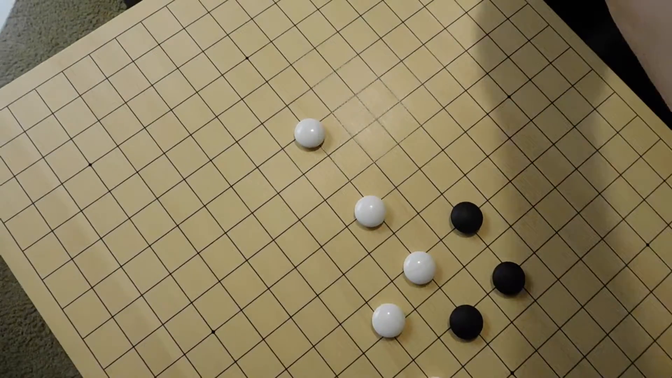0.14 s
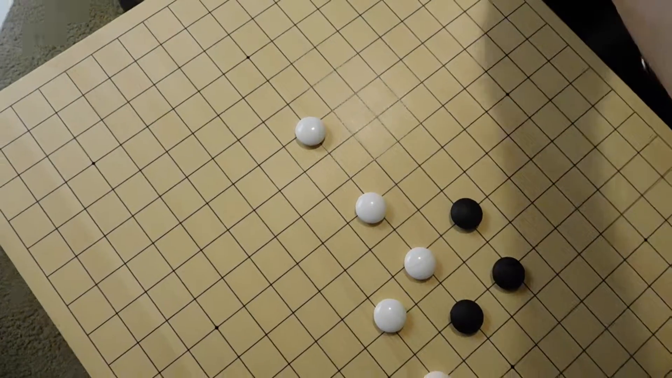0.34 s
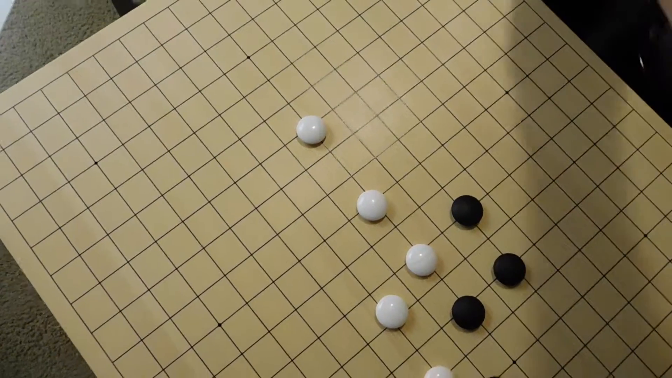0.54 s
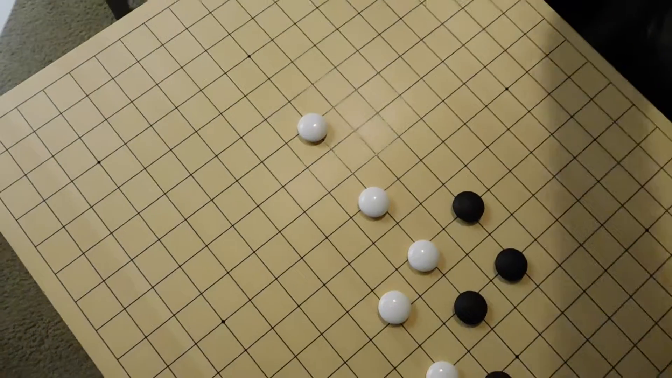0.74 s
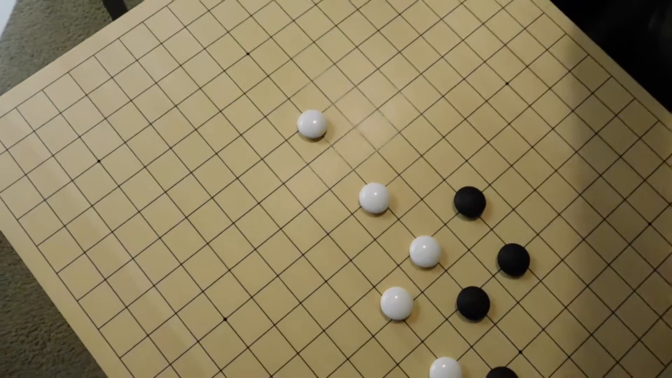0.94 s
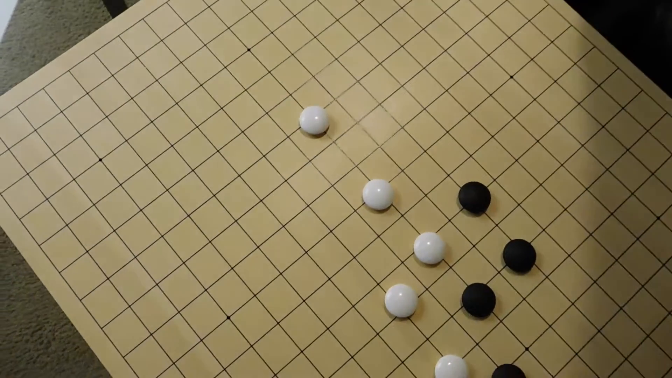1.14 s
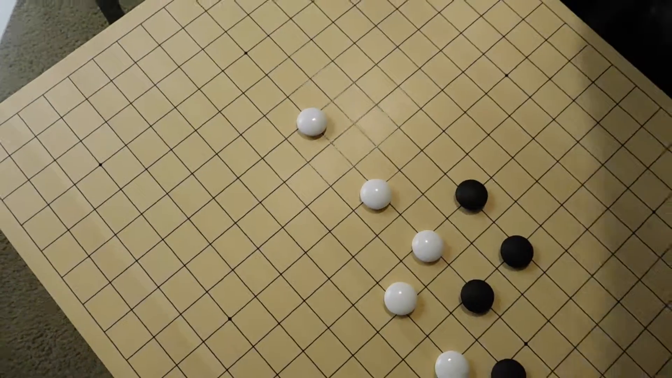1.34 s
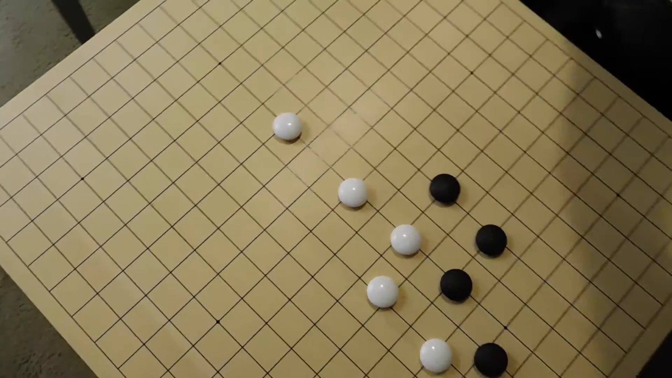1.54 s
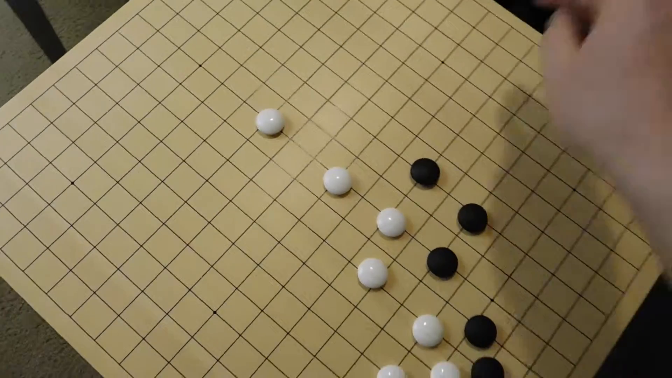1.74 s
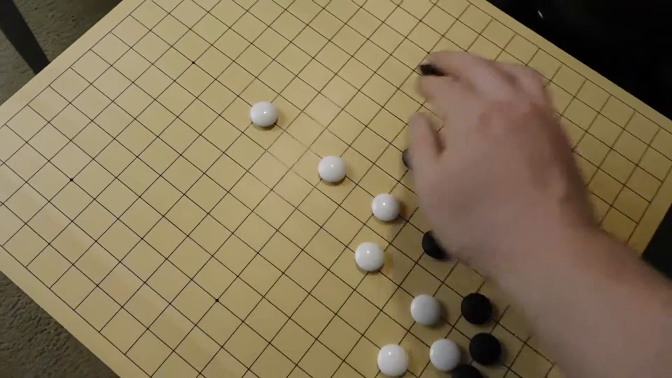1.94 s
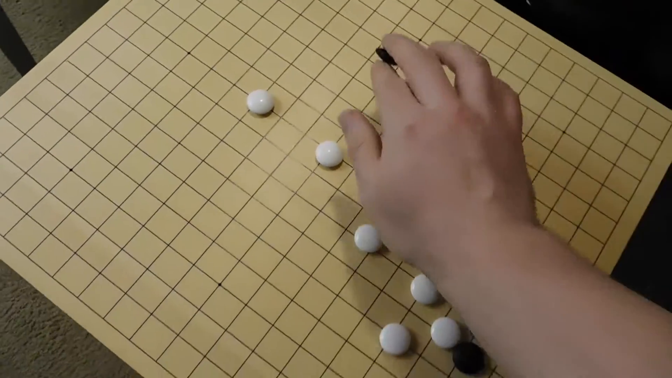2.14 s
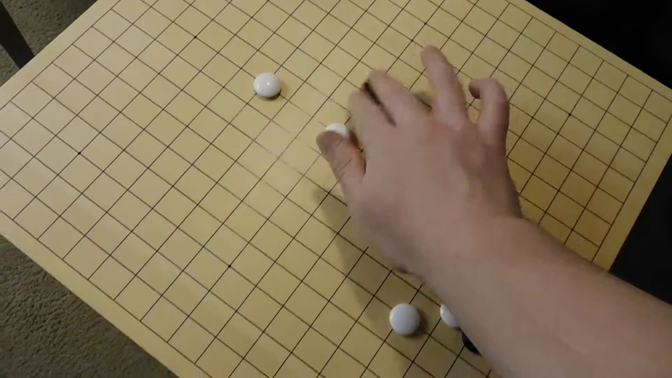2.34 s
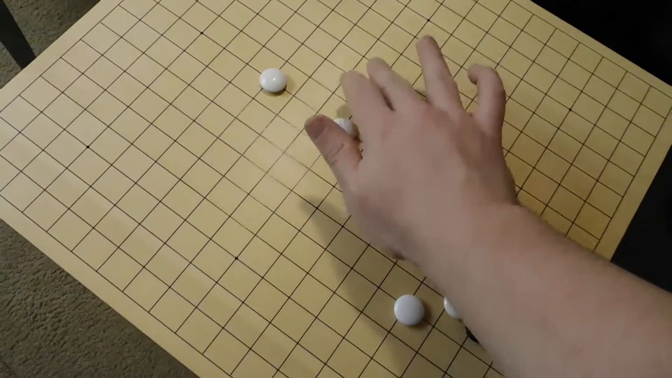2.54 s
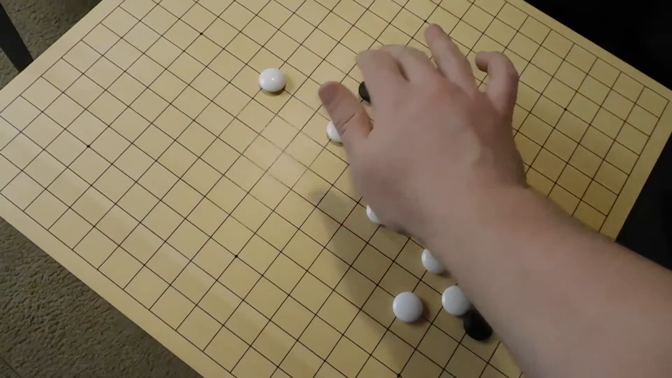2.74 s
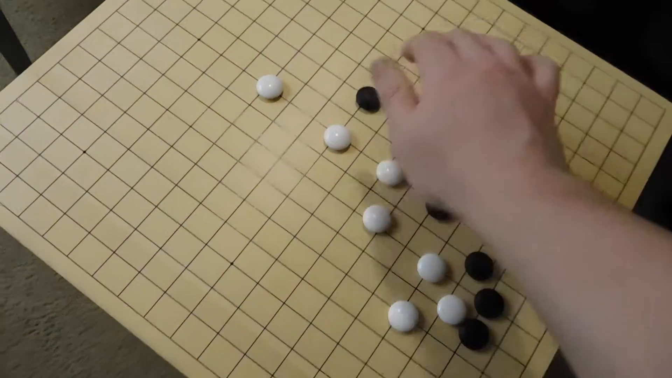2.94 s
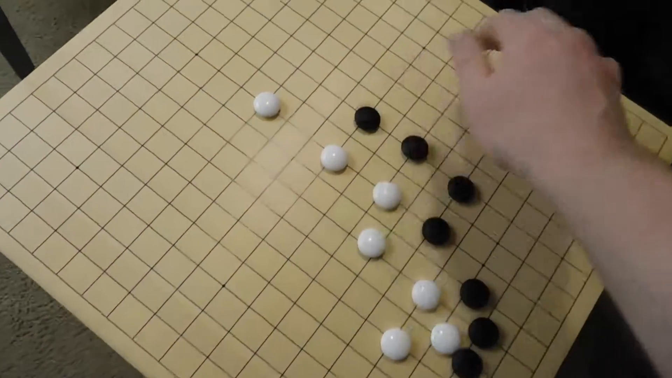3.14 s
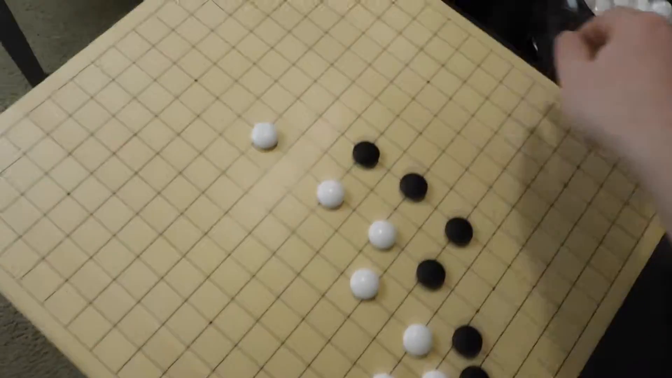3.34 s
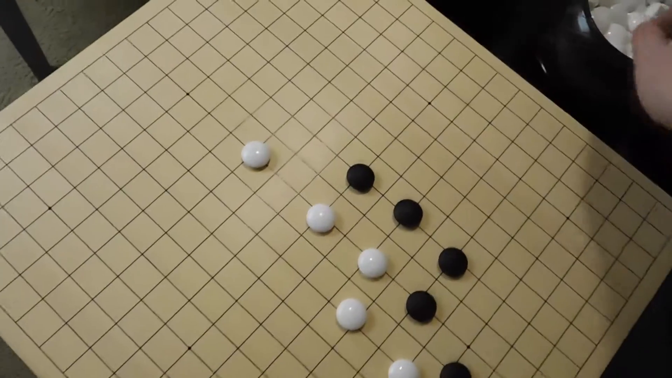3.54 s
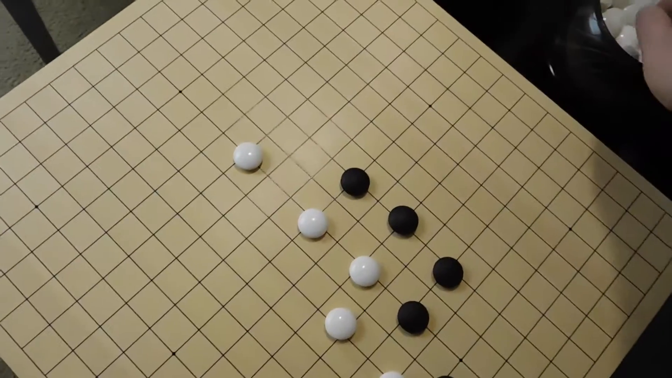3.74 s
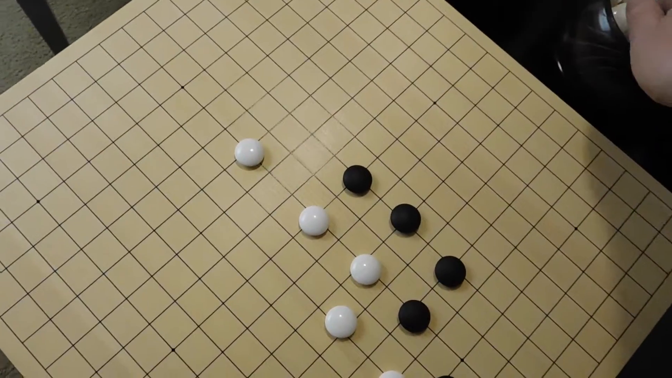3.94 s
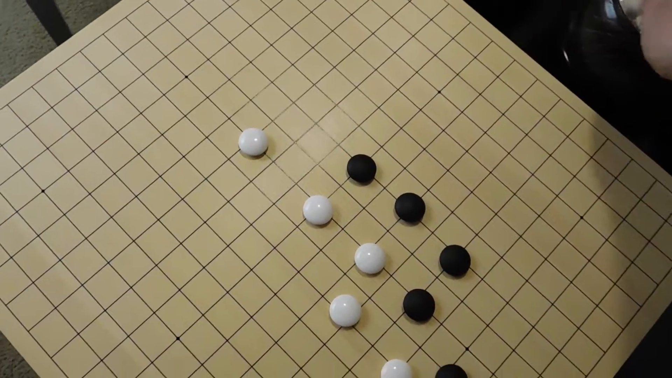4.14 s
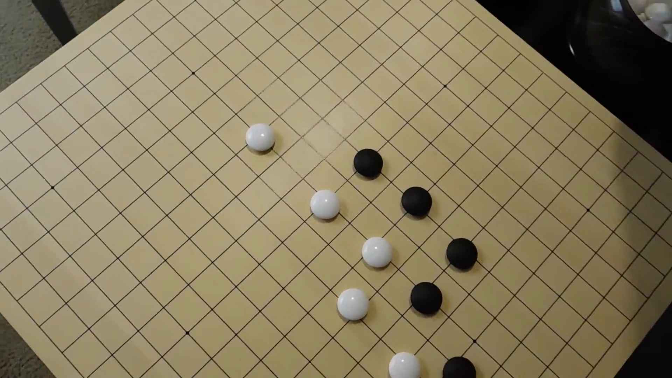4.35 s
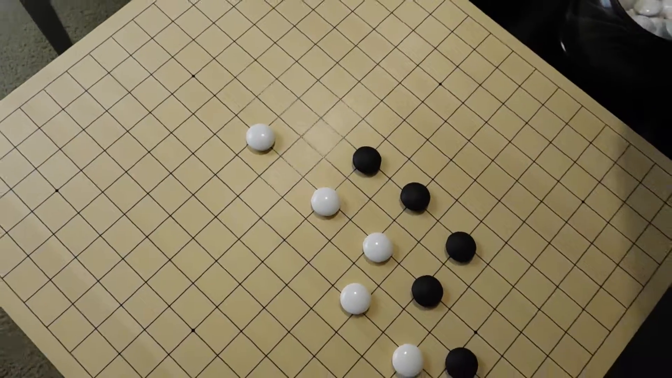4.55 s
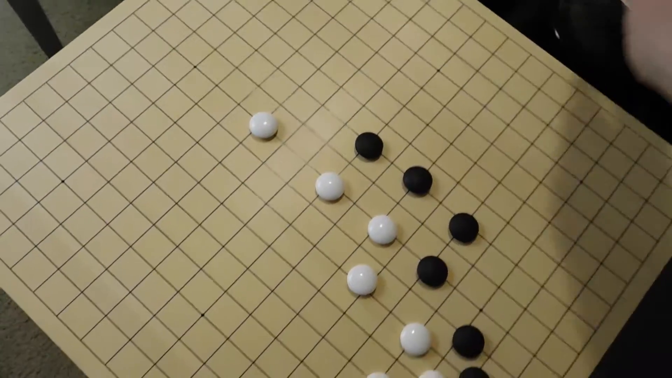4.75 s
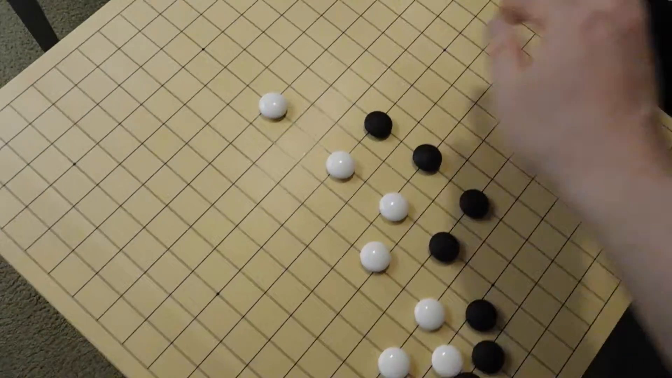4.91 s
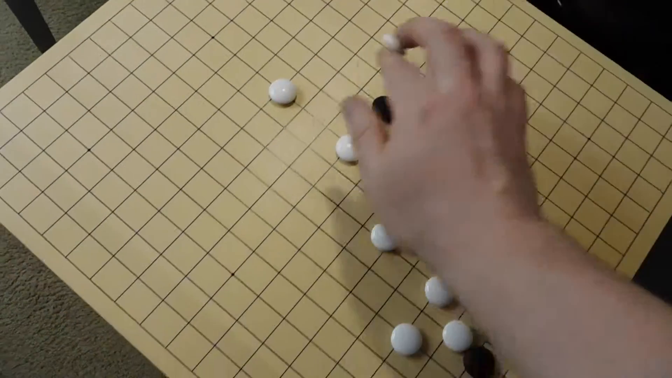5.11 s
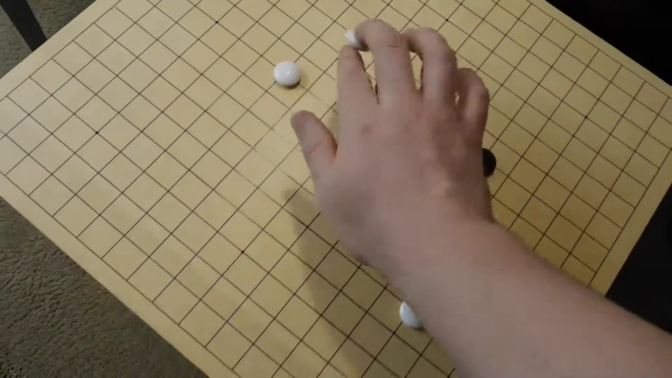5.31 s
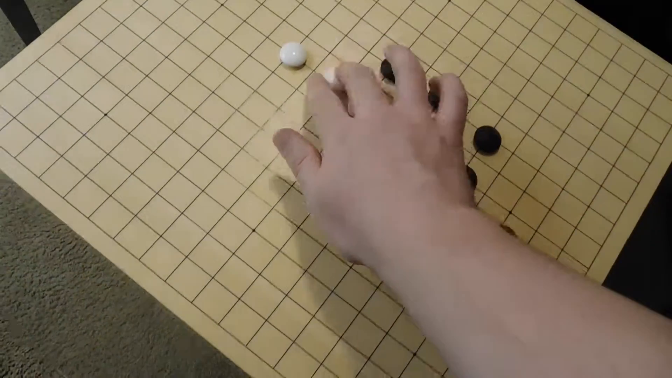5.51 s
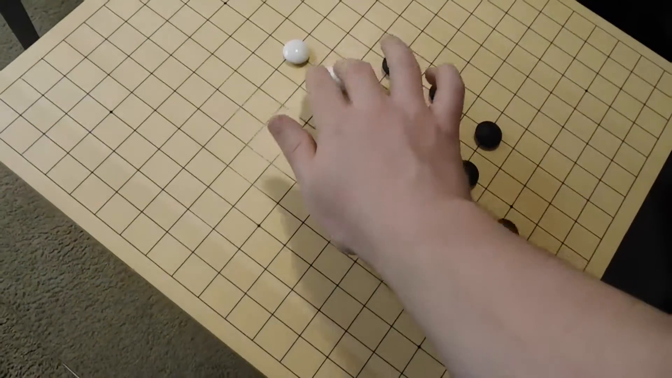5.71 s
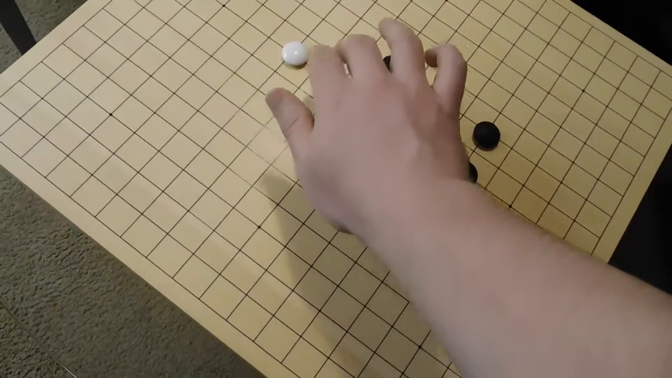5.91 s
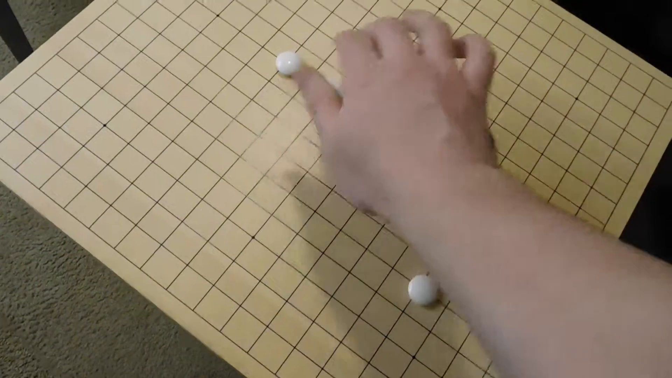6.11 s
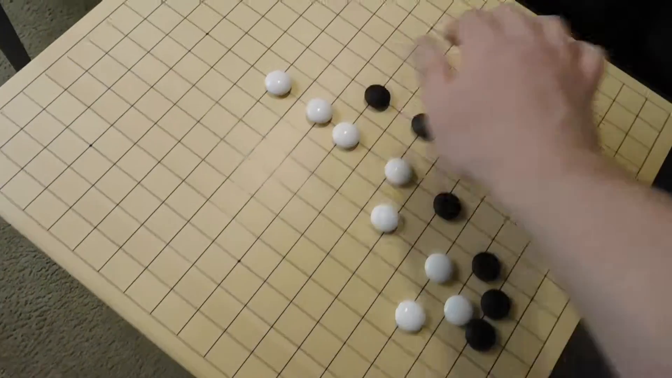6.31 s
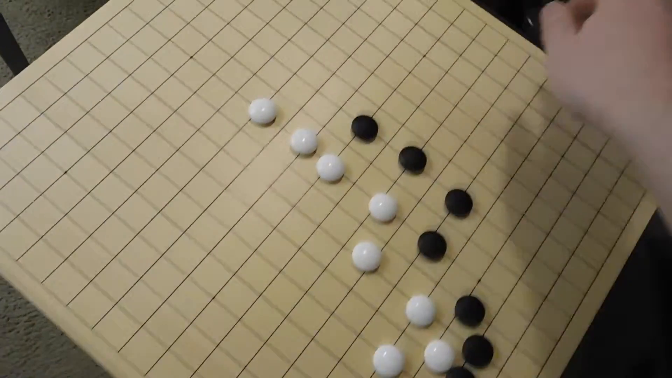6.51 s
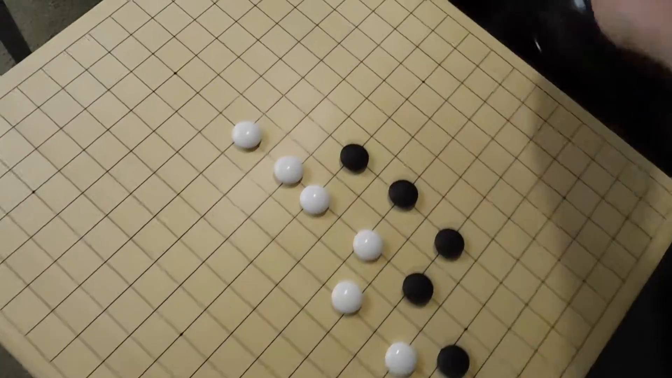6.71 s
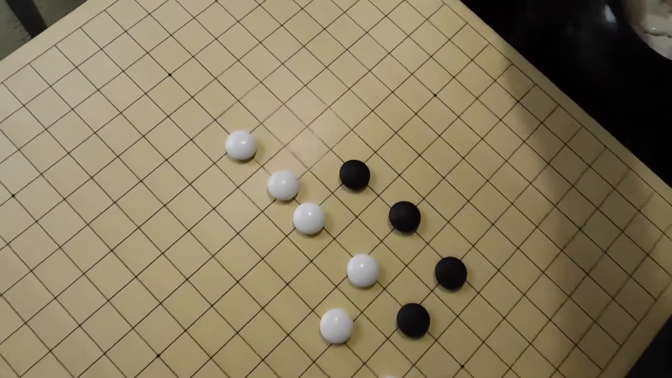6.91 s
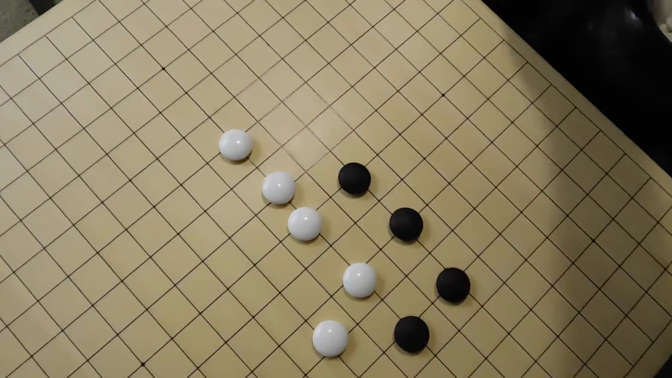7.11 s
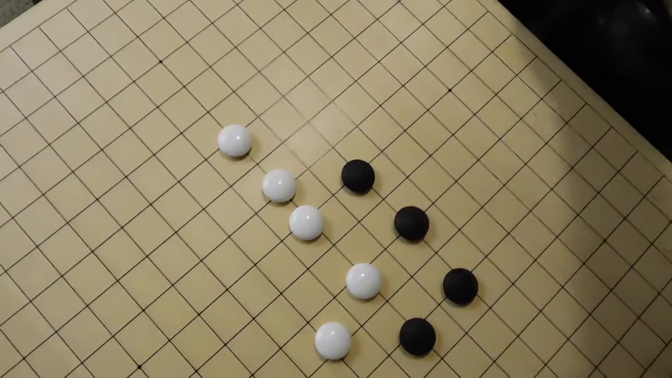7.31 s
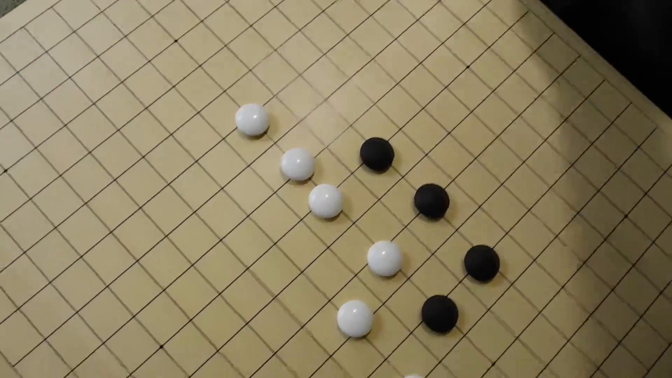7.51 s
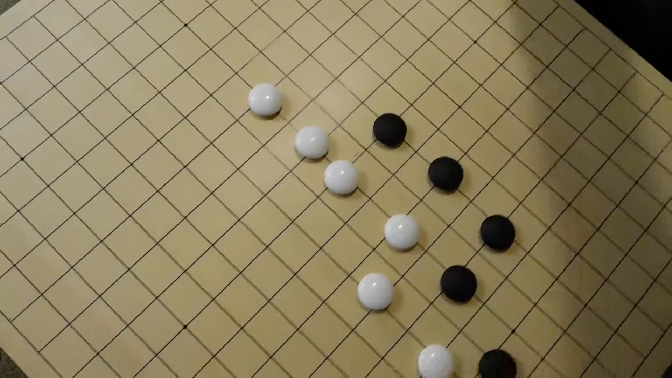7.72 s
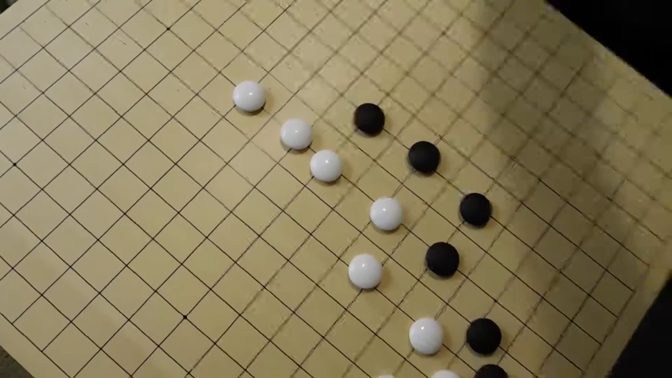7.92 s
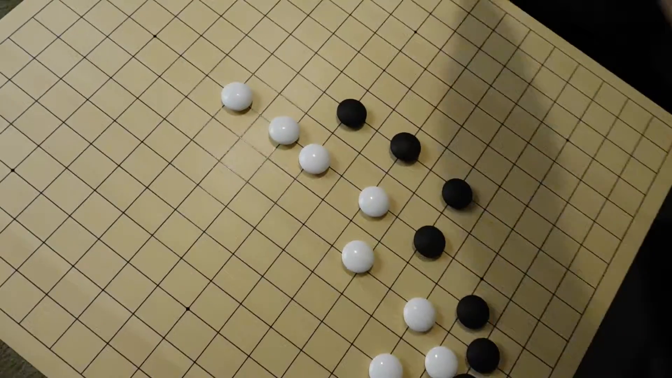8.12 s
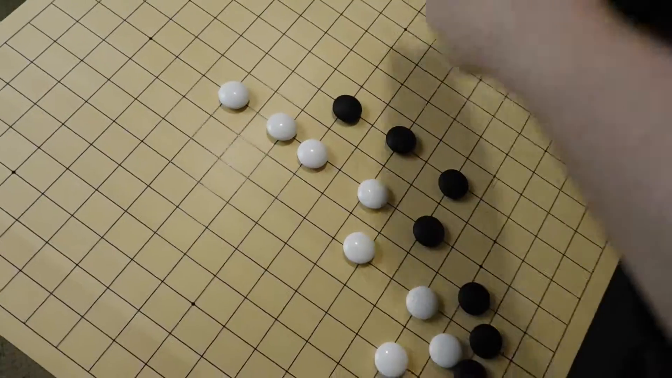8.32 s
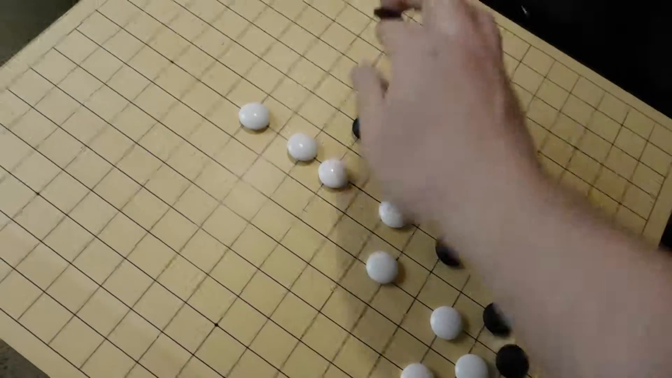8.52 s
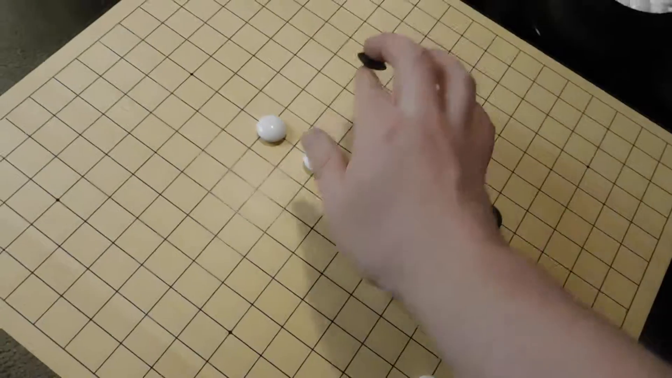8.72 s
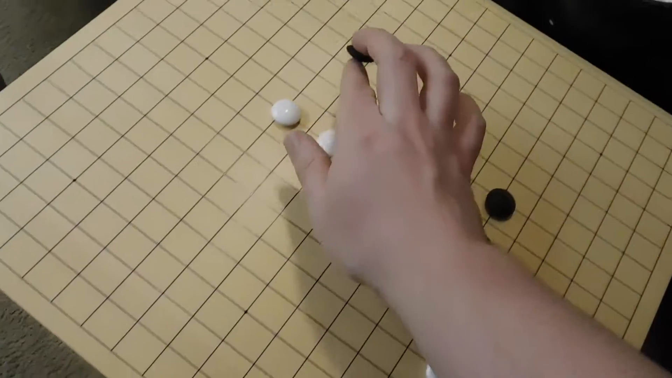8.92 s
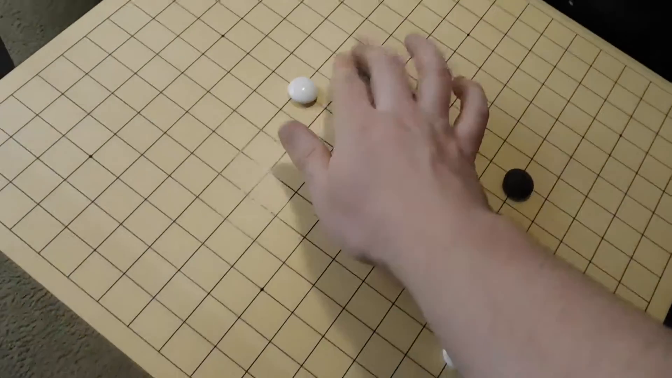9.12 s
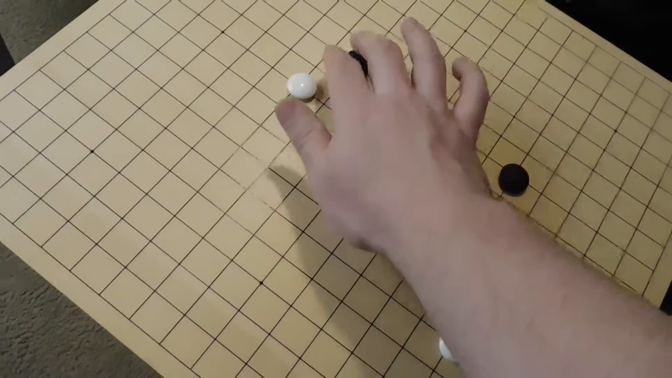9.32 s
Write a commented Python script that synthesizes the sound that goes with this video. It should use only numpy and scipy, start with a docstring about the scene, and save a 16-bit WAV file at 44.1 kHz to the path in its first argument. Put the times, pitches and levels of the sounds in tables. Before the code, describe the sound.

Three playing stones are slapped sharply onto a wooden board, with stones rattling softly in a bowl between moves.

```python
"""A small, quiet room: three playing stones are slapped onto a wooden board. Each blow rings the
board's modes, overloads the close microphone and sets the table wobbling. Between moves fingers stir
the stones in their bowl, where they tick, rattle and rub against each other. A ventilator hums faintly."""
import sys
import numpy as np
from scipy import signal
from scipy.fft import rfft, irfft
from scipy.io import wavfile

SR = 44100
rng = np.random.default_rng(int(sys.argv[2]) if len(sys.argv) > 2 else 0)


def persist_wave(psi):
    """Save psi, clipped to +-1, as 16-bit WAV."""
    counts = np.round(np.clip(psi, -1, 1) * 32767).astype(np.int16)
    wavfile.write(sys.argv[1], SR, np.atleast_2d(counts).T)


N = 412776
TIME = np.arange(N) / SR
RING_TIME, BRIEF_TIME = TIME[:SR // 2], TIME[:4096]

# clearest collisions in the bowl (time [s], tick level [dB], clack level [dB])
COLLISIONS = [(0.1486, -20.5, -39), (0.154, -22, -32.5), (0.2043, -23.5, -32), (0.2229, -23, -32.5),
              (0.382, -21.5, -37), (0.4488, -7.5, -31.5), (0.4992, -18.5, -38.5), (1.1506, -4.5, -25),
              (1.1583, -4.5, -22.5), (1.1644, 1, -25.5), (3.4458, -45, -42.5), (3.4815, -39, -39.5),
              (3.8736, -25.5, -30), (3.909, -17.5, -31), (3.9971, -23, -32.5), (4.0795, -30, -38.5),
              (4.0901, -24.5, -41), (4.118, -25.5, -36.5), (4.1867, -9, -30), (4.2506, -19, -32.5),
              (4.2724, -25.5, -41), (4.476, -27, -41.5), (7.1747, -24, -42), (7.1802, -14.5, -31.5),
              (7.2599, -25.5, -40), (7.3785, -26, -40), (7.4629, -36, -28), (7.4768, -26, -44),
              (7.5314, -24, -37), (7.538, -17, -43), (7.5985, -19, -15.5), (7.7422, -21, -29),
              (7.7869, -21, -18.5)]
# bright tick of a stone (frequency [Hz], relative density [dB])
TICK_SPECTRUM = [(1500, -18), (4000, -19), (7000, -6), (11000, -2), (13500, -3), (16000, -15)]


def wood_blows(ring_db=-9, crack_db=-2, tick_db=-18, node_share=0.2, detune=0.0031):
    """Each blow rings the wood's modes, weighted by their shape at the struck spot; the stone ticks."""
    # blows and rebounds on the board; at 7.6 s, a dull wooden knock of stones against their bowl
    # (time [s], force [dB], contact cut-off [Hz], struck spot [0-1])
    strikes = [(2.3954, -0.5, 3750, 0.92), (2.4247, -15, 2726, .926), (5.5362, -2.5, 4145, .324),
               (5.5424, 4.5, 6160, 0.33), (5.552, 1.5, 4250, .324), (7.5996, -14.5, 1570, 0.34),
               (9.1726, 6, 6200, .42), (9.178, -1.5, 4200, 0.43), (9.2039, -7, 3300, 0.46)]
    # board modes (frequency [Hz], level [dB])
    board_modes = [(280, -15), (355, -16.5), (630, -28), (740, -12), (772, -9.5), (872, -6), (980, -4.5),
                   (1060, -6), (1209, 5.5), (1325, -1), (1594, -2.5), (1668, -9), (1953, 3), (2142, 1),
                   (2214, -3), (2347, 2.5), (2480, -11.5), (2620, -10), (2806, 2), (3130, -1), (3279, -9),
                   (3434, 3), (3744, -3.5), (3995, -2.5), (4869, -7.5), (5330, -6.5)]
    # dense, fast-dying board modes (frequency [Hz], relative density [dB])
    crack_spectrum = [(100, -20.5), (300, -14.5), (660, -12.5), (820, -0.5), (1300, -1), (3600, 4.5),
                      (4600, 1.5), (7000, -2), (16000, -31)]
    out = np.zeros(N)
    hz, mode_db = np.transpose(board_modes)
    t60_s = 0.074 * (hz / 1000) ** -0.18
    for start_s, force_db, contact_hz, spot in strikes:
        loaded_hz = hz * (1 + detune * rng.standard_normal(len(hz)))   # stone and fingers load the wood
        modes = np.sin(2 * np.pi * loaded_hz[:, None] * RING_TIME) * decay(t60_s[:, None])
        shape = np.cos(spot * np.sqrt(hz))   # bending waves: wavenumber ~ root of frequency
        weights = from_db(mode_db + ring_db) * (shape + node_share * np.sign(shape))
        wood = weights @ modes + from_db(crack_db) * burst(crack_spectrum, t60_s=0.049)
        contact = signal.butter(4, contact_hz, fs=SR, output="sos")   # longer contact, duller blow
        add(out, start_s, from_db(force_db) * signal.sosfilt(contact, wood))
        add(out, start_s, from_db(force_db + tick_db) * snap(TICK_SPECTRUM, t60_s=0.011))
    return out


def table_wobble():
    """The hand's weight sways the table; the two lowest modes beat."""
    # hand landings (time [s], level [dB])
    presses = [(2.403, -8.5), (5.541, -6), (9.174, -6.5)]
    # sway modes (frequency [Hz], level [dB], t60 [s])
    sway_modes = [(21.13, -3.3, 1.9), (24.53, -.8, 1.05), (76, -18.5, .42)]
    t = TIME[:2 * SR]
    sway = sum((-1) ** k * from_db(db) * np.sin(2 * np.pi * hz * t) * decay(t60_s, t)
               for k, (hz, db, t60_s) in enumerate(sway_modes))
    out = np.zeros(N)
    for start_s, db in presses:
        add(out, start_s, from_db(db) * sway)
    return out


def table_thuds():
    """Soft, heavy contacts thud through the table top."""
    # bumps of bowl and hand (time [s], level [dB])
    bumps = [(1.151, -16.5), (2.398, -24), (5.539, -15), (9.176, -17)]
    # thud and hollow note of the top (frequency [Hz], relative density [dB])
    thud_spectrum = [(50, -24), (85, 3.5), (140, 0), (200, -4.5), (400, -21.5), (660, -20), (800, 6.5),
                     (930, 1.5), (1150, -22), (2500, -59.5)]
    out = np.zeros(N)
    for start_s, db in bumps:
        add(out, start_s, from_db(db) * burst(thud_spectrum, t60_s=0.096, rise_s=0.0033))
    return out


def clinks(tick_gain_db=-1, clack_gain_db=6, knock_gain_db=-4, spread_db=3, detune=0.06):
    """Stone on stone ticks and clacks; the bowl's hollow knock grows with both."""
    # bowl modes (frequency [Hz], level [dB], t60 [s])
    bowl_modes = [(370, -18, .04), (640, -16.5, 0.025), (808, -7.5, 0.035), (860, -8, 0.063),
                  (926, -5.5, 0.035), (1180, -7.5, .025), (1400, -11, 0.026), (1830, -6, .02)]
    # woody clack (frequency [Hz], relative density [dB])
    clack_spectrum = [(400, -3), (950, -13), (1400, 2), (1900, -7.5), (2600, 3), (3100, -3.5), (3800, 1.5),
                      (4800, -8), (6200, -4.5), (10000, -27.5)]
    out = np.zeros(N)
    hz, mode_db, t60_s = np.transpose(bowl_modes)
    signs = (-1) ** np.arange(len(hz))
    fades = decay(t60_s[:, None], BRIEF_TIME)
    for start_s, tick_db, clack_db in list(COLLISIONS) + rattles() + jostles():
        loaded_hz = hz * (1 + detune * rng.standard_normal(len(hz)))   # shifting heap retunes the bowl
        modes = np.sin(2 * np.pi * loaded_hz[:, None] * BRIEF_TIME) * fades
        weights = signs * from_db(mode_db + spread_db * rng.standard_normal(len(hz)))
        tick = from_db(tick_db + tick_gain_db) * snap(TICK_SPECTRUM, t60_s=0.0087)
        clack = from_db(clack_db + clack_gain_db) * burst(clack_spectrum, t60_s=0.016, t=BRIEF_TIME)
        knock = from_db((tick_db + clack_db) / 2 + knock_gain_db) * weights @ modes
        add(out, start_s, tick + clack + knock)
    return out


def rattles(touches=3, mean_gap_s=0.012, first_drop_db=12, loss_db=4):
    """After a collision the neighbours touch unevenly, ever more softly; rows as in COLLISIONS."""
    rows = []
    drops_db = first_drop_db + loss_db * np.arange(touches)
    for start_s, tick_db, clack_db in COLLISIONS:
        gaps_s = mean_gap_s * (0.5 + rng.random(touches))
        rows += zip(start_s + np.cumsum(gaps_s), tick_db - drops_db, clack_db - drops_db)
    return rows


def jostles(peak_rate_per_s=30, over_sliding_db=7, clack_rel_db=-9):
    """Small random collisions, denser and harder in a brisk stir; rows as in COLLISIONS."""
    speed = stirring()
    chance = peak_rate_per_s / SR * np.sqrt(speed / speed.max())
    hits = np.flatnonzero(rng.random(N) < chance)
    tick_db = 20 * np.log10(speed[hits]) + over_sliding_db
    return list(zip(hits / SR, tick_db, tick_db + clack_rel_db))


def stirring(fade_s=0.035):
    """Speed of the stirred heap, as a gain; each stir fades in and out."""
    # sliding, one curve per stir (time [s], level [dB])
    stirs = [
        [(0, -36), (.06, -48), (.19, -38), (.3, -52.5), (.5, -47.5), (.58, -57), (.73, -54.5), (1.08, -55.5)],
        [(3.85, -57), (3.95, -42), (4.05, -61), (4.12, -46), (4.18, -53), (4.23, -42), (4.31, -56)],
        [(7.16, -58.5), (7.29, -50), (7.34, -53), (7.55, -45), (7.69, -51.5), (7.74, -36), (7.8, -44),
         (7.87, -56)],
    ]
    speed = np.zeros(N)
    for stir in stirs:
        times_s, db = np.transpose(stir)
        inside_s = np.minimum(TIME - times_s[0], times_s[-1] - TIME)
        gate = np.clip(1 + inside_s / fade_s, 0, 1)
        speed += gate * from_db(np.interp(TIME, times_s, db))
    return speed


def rubbing(stick_db=-57):
    """Sliding stones hiss and catch; under a light touch they stick."""
    # sliding noise (frequency [Hz], relative density [dB])
    rub_spectrum = [(400, 4), (850, 1), (1500, 4.5), (4000, -5.5), (7000, -4), (11000, -10), (16000, -16.5)]
    speed = np.sqrt(np.maximum(stirring() ** 2 - from_db(stick_db) ** 2, 0))
    hiss = speed * coloured(rng.standard_normal(N), rub_spectrum)
    return (hiss + drawn_stone()) * stick_slip()


def drawn_stone(start_s=3.495, length_s=0.091, gain_db=-50.5):
    """One stone is drawn over the others: friction noise swells and fades in its resonances."""
    # stone resonances (frequency [Hz], width [Hz], level [dB])
    resonances = [(2520, 320, -1), (3660, 450, 0), (5000, 4000, 2.5), (9900, 6100, -4)]
    out = np.zeros(N)
    swell = np.sqrt(np.hanning(int(length_s * SR)))
    for hz, width_hz, db in resonances:
        friction = resonant_noise(hz, width_hz, SR)[:len(swell)]
        add(out, start_s, from_db(gain_db + db) * swell * friction)
    return out


def stick_slip(slips_per_s=173, slip_t60_s=0.0084, spread_db=3.5):
    """Friction catches in tiny, uneven slips on top of a steady drag; a gain of rms 1."""
    onsets = rng.random(N) < slips_per_s / SR
    sizes = from_db(spread_db * np.minimum(rng.exponential(1, N), 3))
    grip = signal.lfilter([1], [1, -decay(slip_t60_s, 1 / SR)], onsets * sizes + 1e-18)
    return unit_rms(1 + unit_rms(grip))


def room(x, wet_db=-8.5, first_wall_s=0.0042, build_s=0.002, early_db=-3, early_t60_s=0.18):
    """Reflections start at the nearest wall, strongest at first; the top treble dies soonest."""
    # reverberation (frequency [Hz], t60 [s])
    reverb_times = [(200, .35), (1000, .35), (4000, .38), (7000, 0.41), (11000, 0.31), (16000, 0.092)]
    hz = np.fft.rfftfreq(len(RING_TIME), 1 / SR)
    white = rfft(rng.standard_normal(len(RING_TIME)))
    edges_hz = np.linspace(0, SR / 2, 40)
    tail = np.zeros(len(RING_TIME))
    for low, high in zip(edges_hz, edges_hz[1:]):
        band = irfft(white * ((hz >= low) & (hz < high)), len(tail))
        tail += band * decay(at_hz(reverb_times, (low + high) / 2))
    tail *= np.clip((RING_TIME - first_wall_s) / build_s, 0, 1)
    tail *= 1 + from_db(early_db) * decay(early_t60_s)
    return x + from_db(wet_db) * signal.fftconvolve(x, tail / np.linalg.norm(tail))[:N]


def ventilator(air_db=-53, rumble_db=-37):
    """Steady air noise, motor hum and narrow duct rumbles."""
    # faint hiss of the air (frequency [Hz], relative density [dB])
    air_spectrum = [(290, -26.5), (500, -2), (613, -10), (668, -7.5), (893, -10), (1190, -10.5),
                    (2190, -20), (2850, -18), (4280, -25), (5630, -24), (16000, -43)]
    # low rumble of the air (frequency [Hz], relative density [dB])
    rumble_spectrum = [(22, -3.5), (40, -3.5), (70, -18), (95, -30.5), (125, -23), (200, -20.5),
                       (330, -22.5), (520, -26), (1500, -65.5)]
    # motor hum (frequency [Hz], rms level [dB])
    hum_tones = [(59.2, -39), (118.4, -55.5), (236.9, -59), (317.6, -56), (489.9, -69)]
    # duct resonances (frequency [Hz], width [Hz], rms level [dB])
    duct_modes = [(52.3, 2.8, -49.5), (138.4, 9.3, -49), (276.4, 4, -50.5)]
    out = from_db(air_db) * coloured(rng.standard_normal(N), air_spectrum)
    out += from_db(rumble_db) * coloured(rng.standard_normal(N), rumble_spectrum)
    for hz, db in hum_tones:
        out += from_db(db) * np.sqrt(2) * np.sin(2 * np.pi * (hz * TIME + rng.random()))
    for hz, width_hz, db in duct_modes:
        out += from_db(db) * resonant_noise(hz, width_hz, N)
    return out


def burst(spectrum, t60_s, rise_s=0.00036, t=RING_TIME):
    """Many close modes struck at once: noise that swells quickly and dies."""
    return coloured(rng.standard_normal(len(t)), spectrum) * decay(t60_s, t) * (1 - np.exp(-t / rise_s))


def snap(spectrum, t60_s):
    """Hard contact, too brief to have a pitch: a burst with its spectrum evened out."""
    rough = burst(spectrum, t60_s, t=BRIEF_TIME)
    flat = irfft(np.exp(1j * np.angle(rfft(rough))))
    even = coloured(flat, spectrum) * decay(10 * t60_s, BRIEF_TIME)
    return even * np.linalg.norm(rough) / np.linalg.norm(even)


def resonant_noise(hz, width_hz, samples):
    """White noise passed twice through a resonator; rms 1."""
    peak = signal.iirpeak(hz, hz / width_hz, fs=SR)
    once = signal.lfilter(*peak, rng.standard_normal(samples))
    return unit_rms(signal.lfilter(*peak, once))


def coloured(x, spectrum):
    """Shape x by a spectrum; rms 1."""
    hz = np.fft.rfftfreq(len(x), 1 / SR)
    return unit_rms(irfft(rfft(x) * from_db(at_hz(spectrum, hz)), len(x)))


def at_hz(points, hz):
    """Read a table on a log-frequency axis."""
    known_hz, values = np.transpose(points)
    return np.interp(np.log(np.maximum(hz, 1)), np.log(known_hz), values)


def decay(t60_s, t=RING_TIME):
    """Exponential fall, 60 dB in t60_s."""
    return np.exp(-np.log(1000) * t / t60_s)


def from_db(db):
    """Decibels to gain."""
    return 10 ** (np.asarray(db) / 20)


def unit_rms(x):
    """Scale to rms 1."""
    return x / np.sqrt(np.mean(x ** 2) + 1e-20)


def add(out, start_s, sound):
    """Mix a sound in at start_s."""
    start = round(start_s * SR)
    out[start:start + len(sound)] += sound[:N - start]


def scene():
    """Board and bowl with room reflections; table and ventilator direct. Mono."""
    blows = room(wood_blows())
    bowl = room(rubbing() + clinks())
    return (blows + bowl + table_thuds() + table_wobble() + ventilator())[None]


def record(dry):
    """The blows clip the input; a steep low-pass cuts the top."""
    cutoff_hz = 16000
    low_pass = signal.ellip(10, 0.1, 70, cutoff_hz, fs=SR, output="sos")
    return signal.sosfilt(low_pass, np.clip(dry, -1, 1))


dry = scene()
out = record(dry)
persist_wave(out)
```